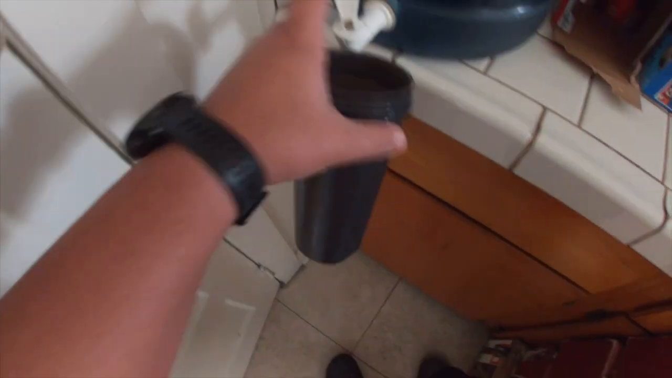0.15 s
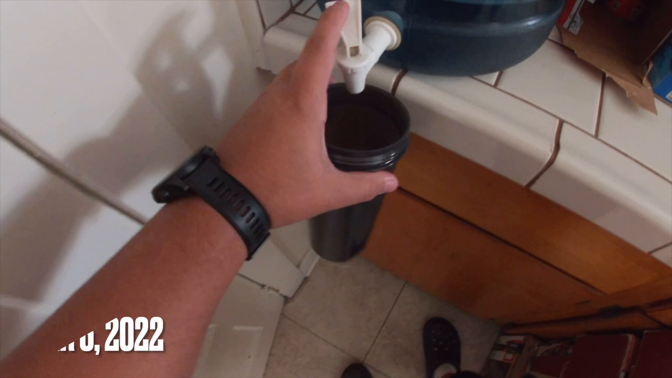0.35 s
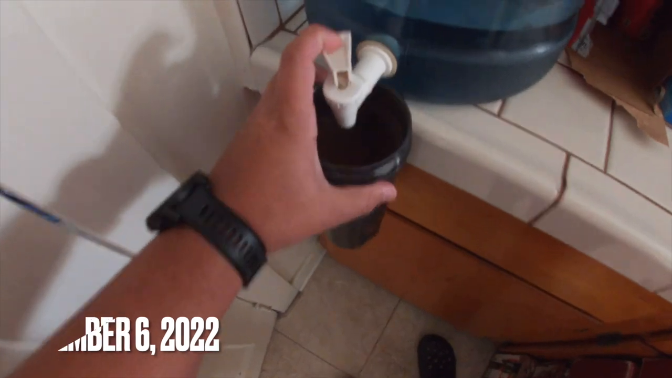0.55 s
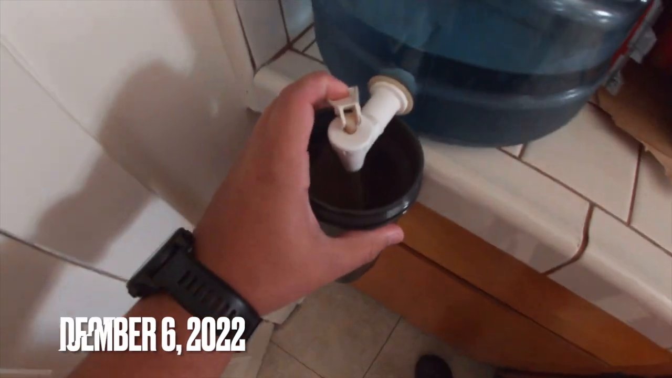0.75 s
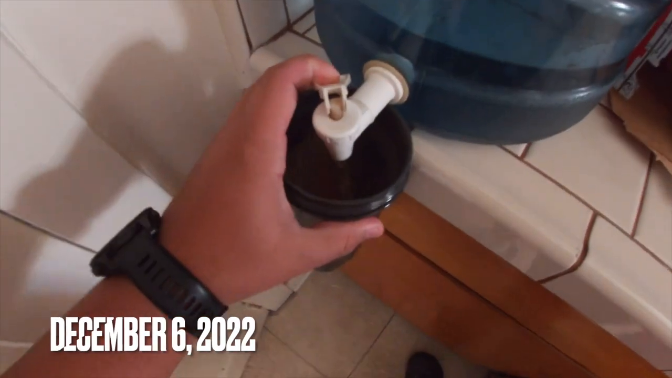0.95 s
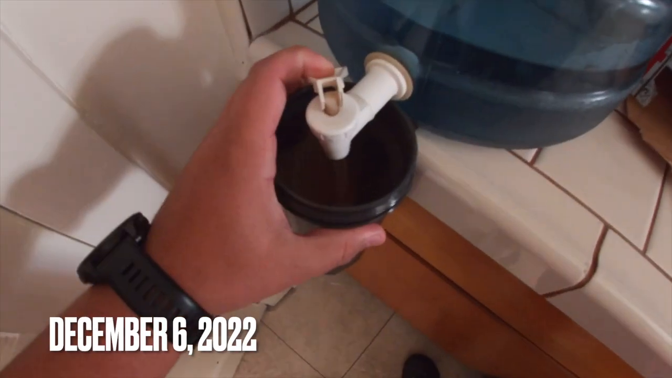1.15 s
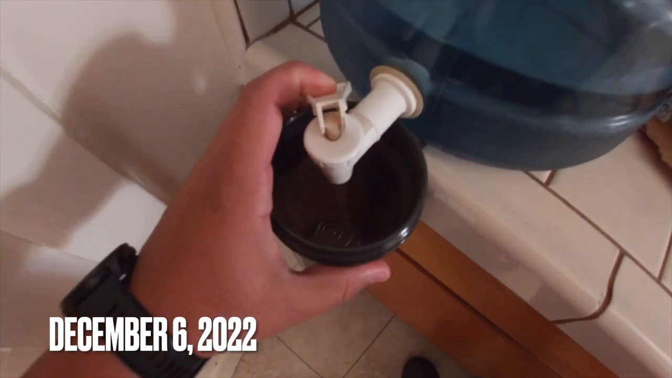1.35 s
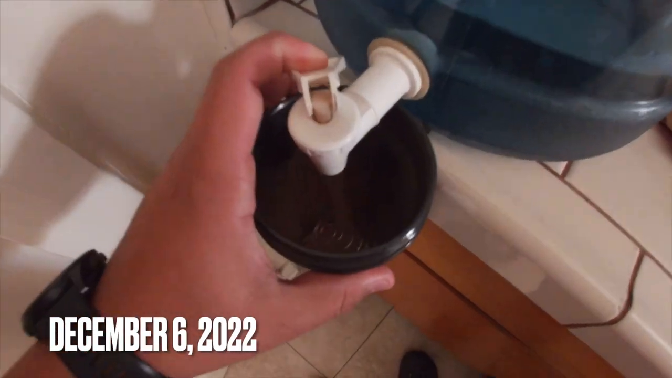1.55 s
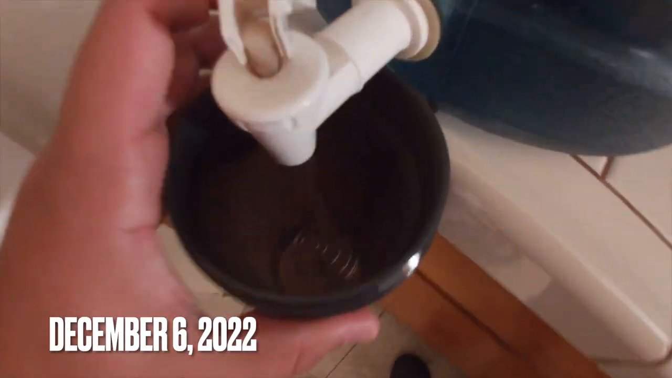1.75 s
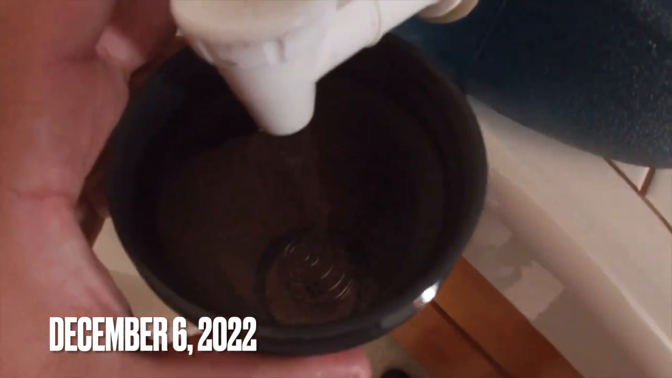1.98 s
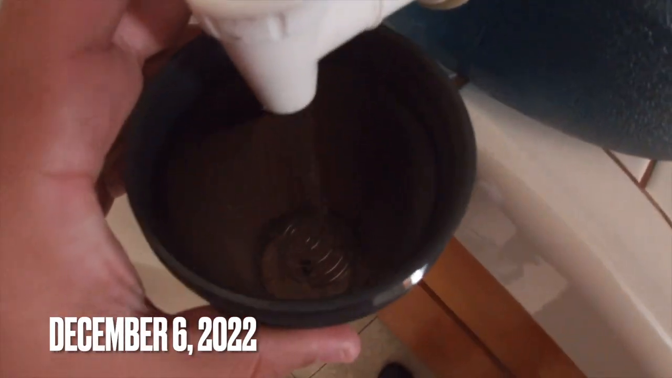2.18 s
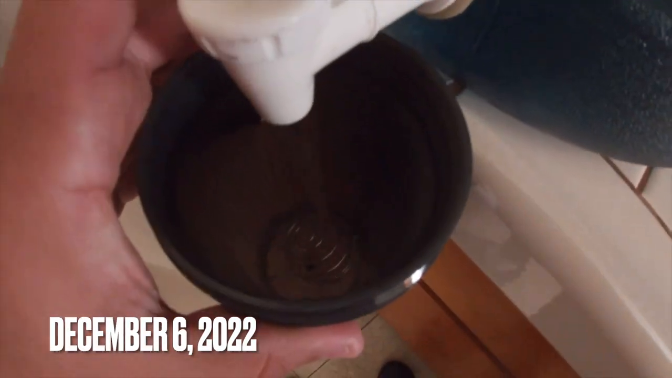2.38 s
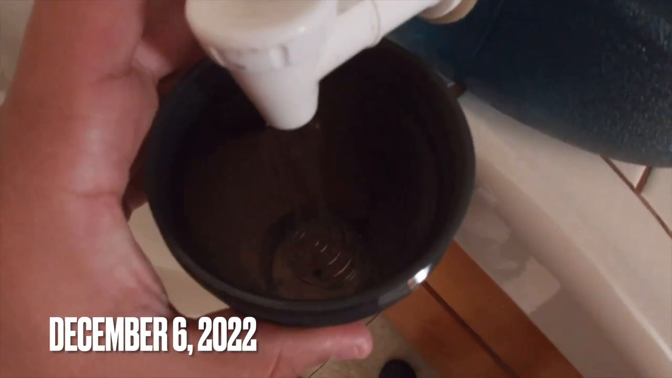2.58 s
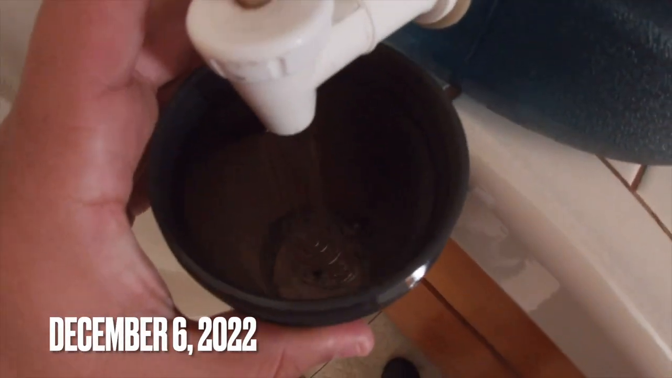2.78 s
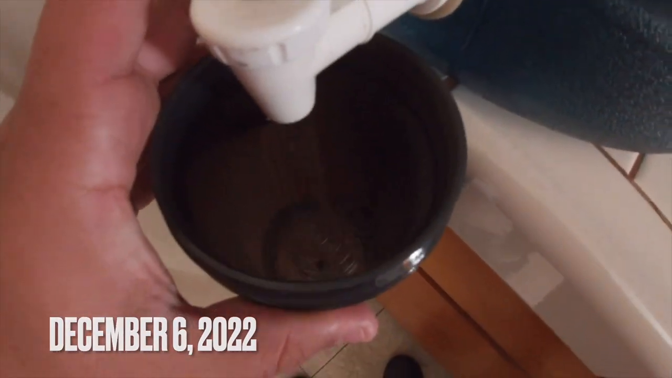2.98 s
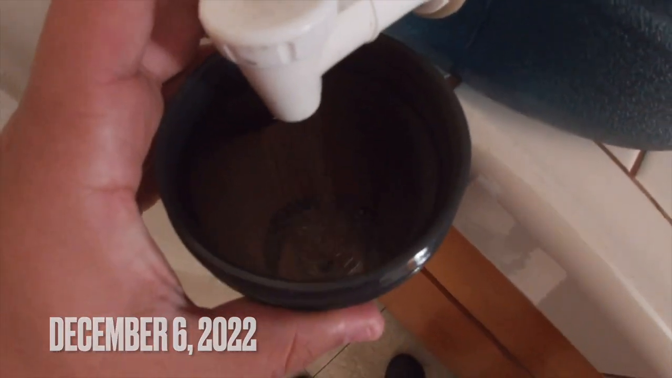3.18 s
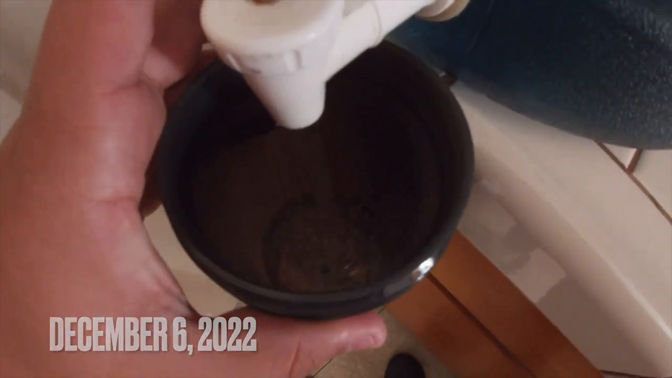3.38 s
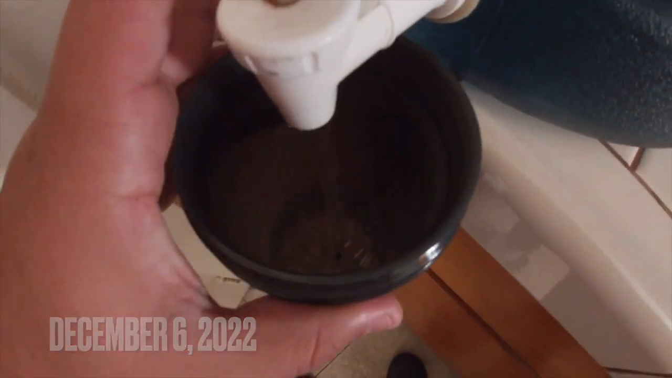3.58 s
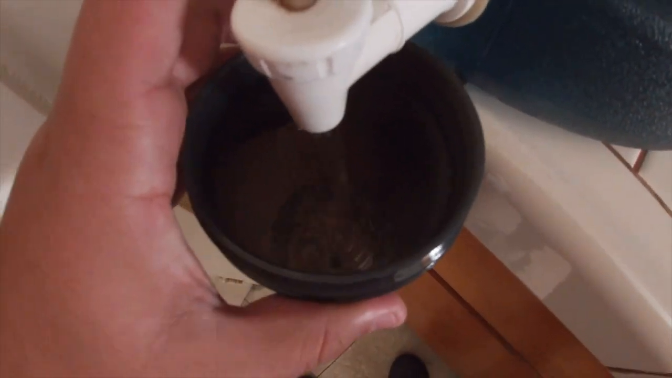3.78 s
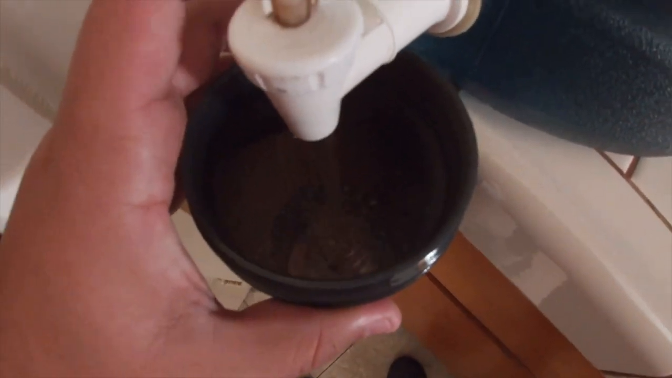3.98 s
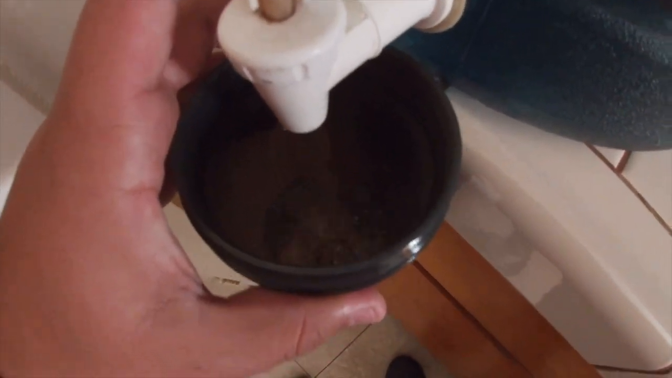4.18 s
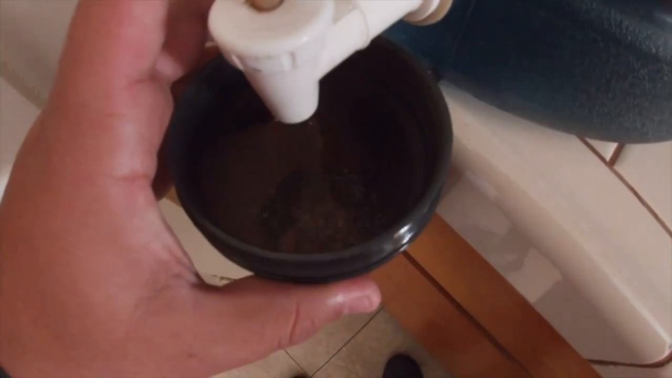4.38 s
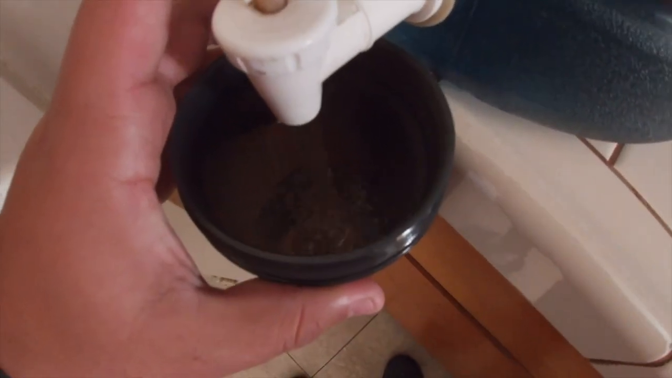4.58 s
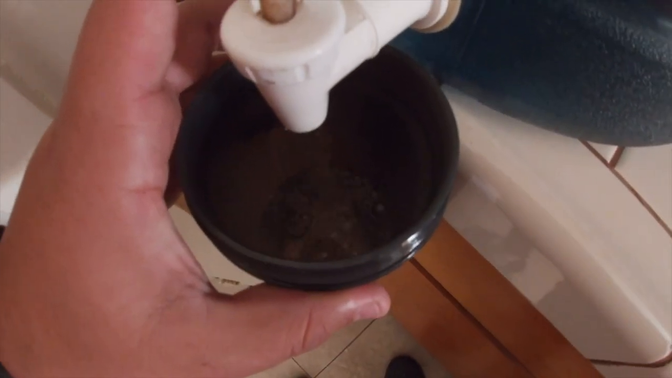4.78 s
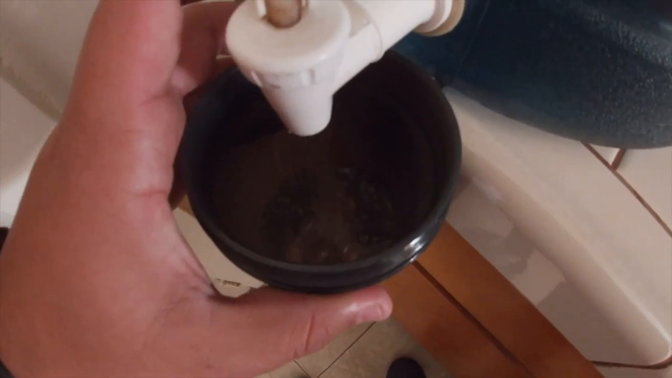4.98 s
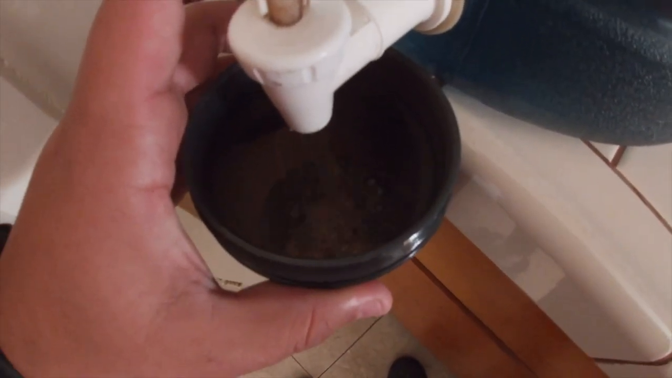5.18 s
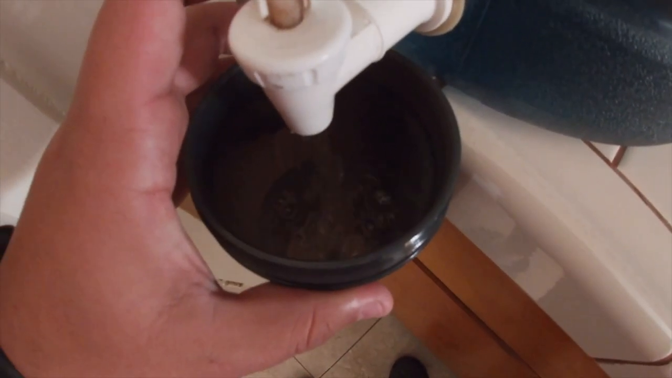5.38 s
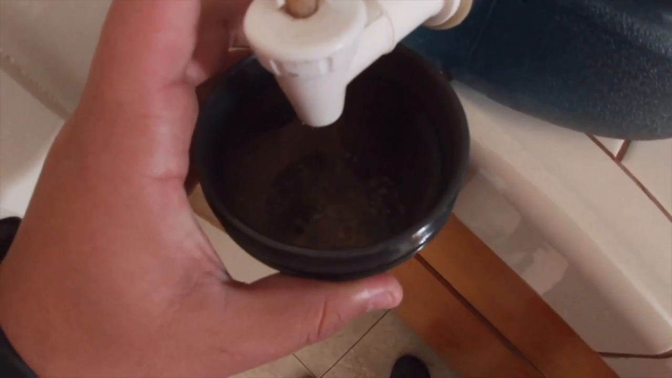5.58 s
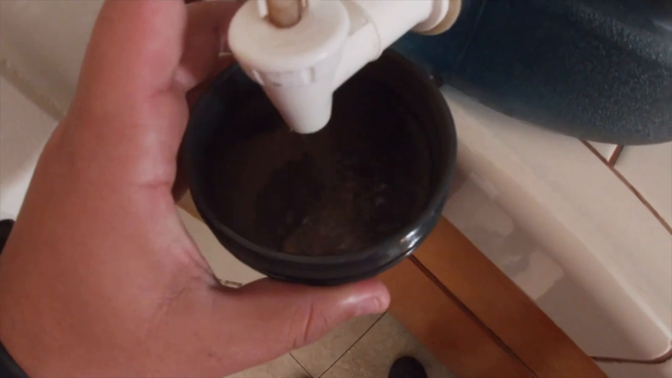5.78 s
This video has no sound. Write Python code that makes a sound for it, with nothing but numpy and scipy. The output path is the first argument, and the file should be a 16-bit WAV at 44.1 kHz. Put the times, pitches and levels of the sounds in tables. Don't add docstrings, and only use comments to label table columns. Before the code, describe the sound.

A hollow knock and light finger rustle come first, then a louder plastic clack as the tap opens. Water patters crisply on the dry cup bottom, soon turning to dense, wet plopping with chirping bubbles and fine fizz. Later the drops grow sparser and higher pitched. Heard very near on a small camera microphone, with short tile reflections and faint room rumble.

```python
import sys
import numpy as np
from scipy import signal
from scipy.fft import rfft, irfft
from scipy.io import wavfile
from scipy.ndimage import map_coordinates

SR = 44100
rng = np.random.default_rng(int(sys.argv[2]) if len(sys.argv) > 2 else 0)


def output_pcm(signal):
    pcm = np.clip(np.atleast_2d(signal).T, -1, 1) * 32767
    wavfile.write(sys.argv[1], SR, np.round(pcm).astype(np.int16))


def invert_db(level):
    return 10 ** (np.asarray(level, dtype=float) / 20)


N = 257741
TIME = np.arange(N) / SR
COVER_S = 1.29

# (time [s], peak level [dB])
PLOPS = [(1.324, -34), (1.345, -20), (1.416, -49), (1.503, -20.5), (1.605, -24), (1.624, -41), (1.653, -25),
         (1.679, -27), (1.712, -21.5), (1.73, -13), (1.785, -13), (1.814, -25), (1.832, -29), (1.851, -20),
         (1.883, -18.5), (1.907, -22.5), (1.92, -17.5), (1.942, -21), (1.976, -33), (2.015, -26.5),
         (2.053, -36), (2.068, -18), (2.102, -44), (2.137, -25), (2.177, -19.5), (2.204, -22), (2.238, -20),
         (2.273, -25), (2.296, -24), (2.312, -20.5), (2.362, -41), (2.384, -20), (2.418, -16), (2.452, -17),
         (2.49, -25), (2.509, -16.5), (2.544, -30), (2.567, -18), (2.632, -21), (2.67, -22), (2.704, -22),
         (2.723, -15.5), (2.767, -28), (2.818, -26.5), (2.852, -24), (2.932, -31), (2.962, -29),
         (3.02, -26.5), (3.064, -50), (3.093, -25), (3.125, -19), (3.139, -20), (3.17, -32), (3.221, -26),
         (3.203, -21), (3.249, -23), (3.311, -48)]
# (time [s], peak level [dB])
DRIBBLES = [(3.3388, -21.5), (3.36, -32), (3.5234, -32), (3.5366, -23), (3.895, -24), (3.7453, -35),
            (3.8033, -27.5), (3.8439, -23), (3.96, -39), (4.0114, -22.5), (4.32, -37), (3.909, -29),
            (4.3936, -24), (4.438, -25.5), (3.977, -26.5), (4.5284, -24), (4.592, -29), (4.8026, -25.5),
            (4.8817, -30), (5.03, -32), (5.0457, -25.5), (5.1172, -18.5), (5.229, -28.5), (5.2594, -27.5),
            (5.2934, -28), (5.471, -44), (5.622, -37), (3.929, -28), (5.697, -49)]
# (time [s], peak level [dB], thump level against the peak [dB])
DRIPS = [(3.326, -18.5, -39), (3.3865, -15, -37), (3.415, -19, -31), (3.453, -14.5, -19),
         (3.4778, -27.5, -28), (3.6042, -18, -23), (3.7022, -25.5, -18), (3.7835, -21, -28),
         (3.8766, -13, -30), (4.043, -21, -17), (4.1649, -14.5, -19), (4.197, -16, -21),
         (4.3588, -20.5, -19.5), (4.4148, -27.5, -12), (4.658, -27, -27), (4.7, -17, -18),
         (4.772, -20, -14), (4.91, -23.5, -12), (4.9547, -23, -23), (5.0102, -27, -22), (5.1014, -22, -13),
         (5.1673, -25, -15), (5.1846, -19, -16), (5.3192, -21.5, -17), (5.367, -25.5, -21),
         (5.438, -27, -22), (5.488, -26, -25), (5.7186, -39, -29), (5.815, -31.5, -27)]
# (time [s], pitch [Hz])
AIR_NOTE = [(1.2, 970), (1.6, 924), (1.9, 996), (2.15, 1048), (2.65, 1035), (2.95, 1081), (3.3, 1212),
            (3.9, 1238), (4.43, 1275), (4.7, 1350), (5.45, 1441), (5.84, 1620)]
# (time [s], flow level [dB], break-up into spray [dB])
FLOW = [(0.74, -55, -27), (0.78, -47.5, 6.5), (1.11, -40, 1.5), (1.28, -38.5, 1.5), (1.8, -36.5, -1.5),
        (2.02, -40, 3.5), (2.37, -37, -0.5), (2.9, -42, 1.5), (3.99, -43, -2.5), (4.15, -46.5, -2),
        (4.4, -45, -3), (5.13, -46, -0.5), (5.34, -49, -2), (5.6, -53, -2), (5.84, -64, 3)]
# (pitch [Hz], level [dB], time to fall 60 dB [s])
LEVER = [(308.2, 1, 0.36), (351.6, 12, 0.14), (428, 10.5, 0.063), (482, 3, 0.32), (570, 8.5, 0.25),
         (863, 5.5, 0.17), (1040, -29, 0.21), (2400, -33, 0.11)]


def column(swell_db):
    # (pitch [Hz], level [dB], time to fall 60 dB [s])
    wall_notes = [(702.3, -22.5, 0.069), (921, -19, 0.063), (1374, -13.5, 0.032)]
    pitch = np.interp(TIME, *np.transpose(AIR_NOTE))
    pushes = invert_db(swell_db) * patter(count=1600, spread_db=4)
    small = unit(resonate(pushes, pitch * (1 + 0.012 * wobble(45)), t60=0.044))

    shallow = [(s, db, -60 + rng.standard_normal()) for s, db in (*PLOPS, *DRIBBLES)]
    s, db, thump_db = np.transpose([*shallow, *DRIPS])
    a, b = rng.standard_normal((len(s), 2)).T
    hz = np.interp(s, TIME, pitch)
    hz = hz * (1 + (0.04 - 0.006 * s) * a)
    ring_s = 0.026 * invert_db(3.7 * b + 0.67 * (s - 4.5))
    big = rings(s, db + 4.5, hz, ring_s, attack=0.0013, size=2400)
    upper = rings(s, db - 10 + 3 * b, 2 * hz * (1 + 0.097 * b), 0.024)

    thump = rings(s, db + thump_db + 8, 600 * (1 + 0.24 * a), 0.017)
    for wall_hz, wall_db, t60 in wall_notes:
        vary_db = 3 * rng.standard_normal(len(s)) - 4.3 * abs(s - 2.92) + 0.6
        thump += rings(s, db + wall_db + vary_db, wall_hz, t60, size=2400)
    slap = rings(s, db - 12.5, 2960 * (1 + 0.2 * b), 0.054, attack=0.00005, size=100)
    return invert_db(stream()[0]) * small + big + upper + thump + slap


def bubbles(swell_db):
    # (time [s], peak level [dB], pitch [Hz])
    base_splats = [(.7368, -23.5, 2400), (.772, -24.5, 2380), (.805, -28, 2300), (.8406, -25.5, 2840),
                   (1.163, -19.5, 3020), (1.2382, -22, 2540), (1.255, -21, 2430)]
    # (time [s], peak level [dB], pitch [Hz])
    bubble_chirps = [(1.3165, -19, 2680), (1.5004, -25, 2670), (1.5176, -16.5, 2980), (1.611, -19, 2820),
                     (1.64, -17, 2750), (1.68, -15.5, 2700), (1.7298, -18, 3070), (1.7847, -30, 2360),
                     (1.8144, -17.5, 2460), (2.0672, -17.5, 2880), (2.1408, -17.5, 2830),
                     (2.1825, -17, 2840), (2.2188, -19, 2900), (2.313, -24, 2800), (2.384, -18, 2840),
                     (2.4168, -20, 2900), (2.439, -14.5, 2970), (2.4632, -17, 3120), (2.4906, -14.5, 2790),
                     (2.6037, -22, 2360), (2.632, -18, 2300), (2.6453, -12.5, 2900), (2.6982, -22, 2950),
                     (3.0937, -24, 3000), (3.1636, -11, 3180), (3.213, -18.5, 3000), (3.289, -23, 3050),
                     (3.312, -23, 3080), (3.36, -22, 2900), (3.487, -19.5, 3640), (3.601, -19.5, 2620),
                     (3.674, -19.5, 3700), (3.882, -22, 2390), (3.997, -17, 3860), (4.041, -18, 3850),
                     (4.1349, -22, 2430), (4.154, -19, 3000), (4.3596, -20, 2960), (4.6596, -29, 4100),
                     (4.6986, -20, 3900), (4.7728, -28, 2400), (4.8832, -30, 1860), (4.9095, -25, 2380),
                     (4.9535, -26, 3630), (5.0097, -30, 2450), (5.03, -18.5, 3230), (5.102, -36, 2290),
                     (5.191, -24.5, 2400), (5.2584, -27, 1940), (5.2596, -20, 2380), (5.3197, -25, 2140),
                     (5.4, -27, 3980), (5.4384, -31, 1960), (5.473, -21, 3070), (5.622, -25, 2890),
                     (5.7716, -24.5, 2570), (5.813, -26, 2060), (5.806, -27, 2340), (5.821, -30, 1620),
                     (5.742, -40, 1610), (2.068, -18, 3900)]
    s, db, a, b = scatter(count=9000, spread_db=3.6)
    hz = 2900 * np.exp(0.307 * a)
    small = in_cup(rings(s, db * s / 3, hz, 16 * invert_db(3.4 * b) / hz, rise=0.21, size=450))
    wash = coloured(rng.standard_normal(N), [(1200, -20), (2000, -2), (4200, 13.5), (5000, -13.5)])
    wash = in_cup(wash)
    third = unit(resonate(small, 3.137 * np.interp(TIME, *np.transpose(AIR_NOTE)), t60=0.0061))

    s, db, hz = np.transpose([*base_splats, *bubble_chirps])
    afloat = s > 1.0
    ring_s = np.where(afloat, 34, 55) / hz
    hz = np.where(afloat, 0.949, 1) * hz
    big = rings(s, db + 1.5, hz, ring_s, rise=0.46 * afloat[:, None], attack=0.00036)
    return invert_db(stream()[1] + swell_db) * (small + invert_db(-6.5) * third + invert_db(-14.5) * wash) + big


def fizz(swell_db):
    # (time [s], peak level [dB],
    # centre pitch [Hz])
    film_bursts = [(0.7648, -22, 8100), (0.8312, -24, 6800), (0.9635, -20, 7200), (1.0044, -17, 6960),
                   (1.0162, -19, 6700), (1.0544, -14, 6700), (1.1012, -9.5, 7100), (1.24, -20, 7200),
                   (1.3054, -27, 7100), (1.318, -10.5, 7100), (1.3942, -17.5, 6800), (1.4784, -20.5, 6100),
                   (1.5065, -26, 5960), (1.61, -18, 7700), (1.6404, -22, 6370), (1.6702, -21, 9000),
                   (1.879, -23, 7300), (1.896, -23, 7200), (2.0645, -24, 7430), (2.079, -14, 7200),
                   (2.1237, -16, 9050), (2.158, -14.5, 8900), (2.1956, -16, 8300), (2.3823, -14.5, 7900),
                   (2.4112, -18, 8510), (2.4709, -26, 7900), (2.4868, -14.5, 7520), (2.5572, -17.5, 6150),
                   (2.597, -19, 9000), (2.6942, -15, 7100), (2.7214, -20, 7950), (2.8032, -14.5, 7450),
                   (2.8995, -33, 6000), (2.9883, -21, 8070), (3.0761, -30, 5930), (3.094, -17, 8900),
                   (3.1514, -32, 7360), (3.1614, -31, 5400),
                   (0.7697, -19, 11120), (1.0162, -18, 11400), (1.115, -19, 10100), (1.153, -18, 13100),
                   (1.2218, -33, 12500), (1.2382, -19.5, 9750), (1.3041, -25, 12100), (1.446, -23, 9800),
                   (1.5061, -25, 9700), (1.7146, -23, 12000), (1.8988, -16.5, 12000), (1.9815, -17, 12400),
                   (2.0274, -19, 12500), (2.0524, -19, 11800), (2.065, -13.5, 11100), (2.098, -19, 9510),
                   (2.1242, -20, 11300), (2.194, -29, 10200), (2.2719, -22, 14400), (2.3193, -18, 11400),
                   (2.385, -18, 11400), (2.427, -19, 15000), (2.4713, -17, 11500), (2.489, -16, 11100),
                   (2.5113, -16, 11500), (2.5788, -16, 11400), (2.7046, -10.5, 11900), (2.723, -18, 11400),
                   (2.8416, -25, 13400), (2.873, -15, 12900), (3.094, -18, 12400), (3.159, -16, 12000),
                   (3.2028, -20, 11600), (3.2626, -16.5, 10500), (3.303, -40, 10900),
                   (3.253, -17, 8100), (3.36, -14, 8500), (3.7016, -20, 8140), (3.736, -18, 12000),
                   (3.756, -16.5, 14000), (3.7832, -12, 12400), (3.9295, -30, 6100), (4.0, -15.5, 5840),
                   (4.0414, -11, 11600), (4.133, -18.5, 14200), (4.1633, -16.5, 7500), (4.195, -15.5, 6460),
                   (4.359, -20, 12600), (4.401, -19, 11300), (4.6572, -25, 6050), (4.7, -20, 5580),
                   (4.801, -24.5, 8550), (4.858, -20.5, 5170), (4.883, -15, 11900), (4.954, -20, 11800),
                   (5.029, -19.5, 7400), (5.093, -16, 11900), (5.165, -13.5, 6430), (5.2496, -19, 7700),
                   (5.321, -17, 11900), (5.3713, -17.5, 14300), (5.4397, -13.5, 5670), (5.57, -23.5, 9200),
                   (5.7168, -17.5, 7430), (5.768, -25, 5630), (5.55, -28, 5900), (5.602, -27.5, 5600),
                   (5.662, -35.5, 5440), (5.787, -23, 7150),
                   (3.831, -23, 12100), (4.0757, -24, 12000), (4.146, -24, 12300),
                        (4.1814, -22, 11600), (4.373, -15.5, 12800), (4.4473, -30, 12200),
                        (4.8312, -23, 10700), (5.3567, -36, 15400), (5.4271, -43, 10600),
                        (5.4896, -16.5, 12800), (5.6236, -29, 11900), (5.696, -32, 9600),
                        (5.8156, -24, 15100), (5.83, -27, 10900)]
    # (pitch [Hz], level [dB], time to fall 60 dB [s], growth [dB/s])
    slosh_notes = [(5540, -2, 0.033, 2.5), (7360, -1.5, 0.0083, 0), (8680, -1.5, 0.014, 1),
                   (10500, -8.5, 0.016, 3.5), (12250, -1.5, 0.01, 1)]
    _, _, fizz_db, mist_db = stream()
    s, db, a, b = scatter(count=5500, spread_db=4.5)
    hz = 7500 * np.exp(0.27 * a)
    grains = in_cup(rings(s, db, hz, 28 * invert_db(3 * b) / hz, rise=0.12, attack=0.0002, size=220))
    hiss = in_cup(rng.standard_normal(N))

    cross = np.zeros(N)
    for note_hz, note_db, t60, grows in slosh_notes:
        s, db, _, _ = scatter(count=900, spread_db=5)
        flicks = puffs(s, db, t60=0.0048)
        moving_hz = note_hz * (1 + 0.011 * (TIME - 3) + 0.0035 * TIME * wobble(30))
        cross += invert_db(note_db + grows * (TIME - 3) + 3 * wobble(9)) * unit(resonate(flicks, moving_hz, t60))

    s, db, a, _ = scatter(count=3200, spread_db=4)
    fine = a > 0
    ticks = puffs(s[fine], db[fine], t60=0.0041)
    mist = unit(coloured(ticks, [(10500, -23), (12300, -7), (13700, 11), (15300, 8)]))
    ticks = puffs(s[~fine], db[~fine], t60=0.0091)
    mist += unit(coloured(ticks, [(7000, -20), (11000, -17.5), (15500, -26.5)]))

    s, db, hz = np.transpose(film_bursts)
    tone = rings(s, db + 0.5, hz, 40 / hz, rise=0.17, attack=0.000078, size=500)
    drop_s, drop_db = drops()
    crack = puffs(np.r_[s, drop_s], np.r_[db, drop_db - 4.5], t60=0.019)
    crack = in_cup(crack) * np.std(crack)

    spray = invert_db(-5) * grains + invert_db(-8.5 - 2.9 * (TIME - 2.5)) * hiss + invert_db(-9.5) * cross
    spray = invert_db(fizz_db + swell_db) * spray
    mist = invert_db(mist_db + swell_db + 2.8 * wobble(8)) * mist
    return spray + mist + tone + invert_db(-12) * crack


def plastic(swell_db):
    running_db = swell_db - 120 * (TIME < FLOW[0][0])
    since = TIME - COVER_S
    base_db = running_db - 46.5 + 3 * np.minimum(since, 0) - 30 * covered() - 5.5 * since
    wall_db = running_db - 56 - 4.5 * abs(TIME - 2.92)
    drive = patter(count=1200, spread_db=6.5)
    base = sum(invert_db(note_db) * unit(resonate(drive, hz, t60)) for hz, note_db, t60 in LEVER)
    base = coloured(base, [(1050, 0), (1250, -30), (2100, -22), (2400, 0)])
    wall = resonate(drive, 700 * (1 + 0.037 * wobble(20)), t60=0.06)
    return invert_db(base_db) * unit(base) + invert_db(wall_db) * unit(wall)


def drops():
    return np.transpose([row[:2] for row in (*PLOPS, *DRIBBLES, *DRIPS)])


def covered():
    return np.clip((TIME - COVER_S) / 0.055, 0, 1)


def stream():
    flow_db, spray_db = curves(FLOW)
    over_db = flow_db + 44
    column_db = -46.5 + 2.03 * over_db + 2 * (TIME - 3)
    column_db += -11.5 * (1 - covered())
    column_db += 3 * (TIME > 5.1)
    break_up_db = 0.63 * over_db + spray_db
    mist_db = -58.5 + 4 * break_up_db + 3.5 * (TIME - 3)
    return column_db, flow_db - 1.5, break_up_db - 44.5, mist_db


def churn():
    blows = np.bincount(np.round(drops()[0] * SR).astype(int), minlength=N)
    stir = signal.lfilter([1], [1, -np.exp(-1 / 0.0023 / SR)], blows)
    chance_db = 3 * np.tanh((2 * wobble(22.03) + 8.4 * wobble(50)) / 3)
    return chance_db + 8 * np.minimum(stir, 1)


def patter(count, spread_db):
    s, db, a, _ = scatter(count, spread_db)
    pushes = np.bincount((s * SR).astype(int), np.sign(a) * invert_db(db), N)
    return coloured(pushes, [(150, -38), (600, -11.5), (900, -4.5), (1600, -1), (4000, -15.5)])


def in_cup(x):
    # (frequency [Hz], gain [dB])
    bare_colour = [(880, -58), (1500, -49), (2970, -24.5), (3350, -18), (4800, -24), (5260, -1.5),
                   (6050, -6), (6820, -1), (13800, -18.5), (16000, -41), (16500, -83)]
    # (frequency [Hz], gain [dB])
    shallow_colour = [(880, -16.5), (1500, -22.5), (1890, -18.5), (2850, -6), (3450, -11), (3970, -6.5),
                      (4660, -14), (7390, 0), (9790, -6), (11600, -13), (15400, -29), (16000, -64),
                      (16500, -0.5)]
    # (frequency [Hz], gain [dB])
    deep_colour = [(880, -8), (1500, 6.5), (1950, 4), (3120, -2), (3410, -6), (4010, 7.5), (4760, -14),
                   (5470, 3), (8680, 1.5), (9500, -10.5), (12300, 5), (15400, -1.5), (16500, -41)]
    wet = np.clip((TIME - 1.02) / 0.18, 0, 1)
    full = np.clip((TIME - 2.4) / 2.8, 0, 1)
    out = np.sqrt(1 - wet) * unit(coloured(x, bare_colour))
    out += np.sqrt(wet * (1 - full)) * unit(coloured(x, shallow_colour))
    return out + np.sqrt(full) * unit(coloured(x, deep_colour))


def knocks():
    # (time [s], ring level [dB], push level [dB])
    blow_events = [
        (.216, -10, -9.5),
        (0.7203, -8.5, 4.5),
        (1.08, -29, -35),
    ]
    # (frequency [Hz], gain [dB])
    rattle_colour = [(59, -50), (100, -11), (570, 1.5), (691, -10), (1010, -1.5), (1800, -25.5),
                     (2370, -13), (3400, -30), (7770, -30), (16000, -40)]
    # (pitch [Hz], level [dB], time to fall 60 dB [s])
    rim_notes = [(304, 1.5, 0.38), (340, -18, .25), (443, 7, 0.26), (477, -3, 0.49), (787, -12, 0.13),
                 (860, 1, 0.11), (1006, 8, 0.13), (1360, -5, .12), (1530, -6, 0.13), (2140, -21, 0.19),
                 (2550, -24, .1)]
    s, ring_db, push_db = np.transpose(blow_events)
    rattle = puffs(s, ring_db, t60=0.25)
    out = invert_db(-13.5) * unit(coloured(rattle, rattle_colour)) * np.std(rattle)
    out -= rings(s, push_db, 748, 0.012, attack=0.00077)
    out += rings(s, push_db - 10, 351, 0.11, attack=0.0067, size=3000)
    for at, db, notes in zip(s, ring_db, (rim_notes, LEVER, LEVER[:4])):
        for hz, note_db, t60 in notes:
            flutter = 1 + 0.12 * wobble(40)
            out -= rings(at, db + note_db - 17.5, hz, t60, size=16000) * flutter
    return out


def fingers():
    # (time [s], peak level [dB], hollow level against the peak [dB])
    finger_ticks = [(0.0144, -38, 8), (0.04, -41, 13), (0.051, -41, -15), (0.062, -38, -3),
                    (0.148, -42, -16), (0.187, -35, -31), (.198, -40, -35), (0.2169, -22, 12),
                    (0.23, -22.5, -20), (0.438, -33, -28), (0.4438, -27, -8), (0.462, -36, -9),
                    (0.4915, -28, 0), (0.5144, -31.5, -21), (0.568, -36, -25), (0.5923, -29, 7),
                    (0.623, -37.5, 2), (0.648, -45, -20), (0.6998, -39.5, -21), (0.7162, -27, 7)]
    # (frequency [Hz], gain [dB])
    skin_colour = [(760, -123), (1300, -23), (1850, -8.5), (2440, -1.5), (3760, -11.5), (4680, -11.5),
                   (5200, -12.5), (6350, -6), (7670, -10), (10700, -14), (16000, -33)]
    hollow = resonate(rng.standard_normal(N), 870 * (1 + 0.0058 * wobble(27.5)), t60=0.044)
    hollow = unit(resonate(hollow, 875, t60=0.072))
    rustle = unit(coloured(rng.standard_normal(N) * invert_db(3.3 * wobble(91.1)), skin_colour))
    rustle = coloured(rustle, [(6000, 1), (10000, -4), (14000, 3)])

    s, db, hollow_db = np.transpose(finger_ticks)
    ticks = puffs(s, db - 0.5, t60=0.016)
    ticks = unit(coloured(ticks, skin_colour)) * np.std(ticks)
    ticks += rings(s, db + hollow_db, 900, 0.017) + rings(s, db - 17, 2374, 0.19)
    hollow = strokes(column_at=2, fade_db_per_s=322) * hollow
    return hollow + strokes(column_at=3, fade_db_per_s=138) * rustle + ticks


def strokes(column_at, fade_db_per_s):
    # (time [s], length [s], hollow level [dB], rustle level [dB])
    finger_strokes = [
        (0, 0.019, -37.5, -46),
        (0.224, 0.058, -44, -42.5),
        (0.458, 0.029, -44.5, -46),
        (0.567, 0.022, -55, -52),
        (0.718, 0.018, -47, -47),
    ]
    rows = np.array(finger_strokes)
    since = TIME - rows[:, :1]
    grip = np.clip(since / 0.019 + 1, 0, 1)
    fade_db = fade_db_per_s * np.maximum(since - rows[:, 1:2], 0)
    return np.sum(grip * invert_db(rows[:, column_at, None] - fade_db), axis=0)


def kitchen(x):
    # (frequency [Hz], time to fall 60 dB [s])
    tile_echo = [(200, 0.32), (1500, 0.21), (10000, 0.029)]
    hz, t, z = signal.stft(rng.standard_normal(SR // 2), SR, nperseg=256)
    fading = z * invert_db(-60 * t / along(tile_echo, hz)[:, None])
    tail = signal.istft(fading, SR, nperseg=256)[1]
    return signal.fftconvolve(np.pad(x, (250, 0)), tail / np.linalg.norm(tail))[:N]


def house():
    # (time [s], rumble level [dB], drone level [dB])
    house_levels = [
        (0.0, -51, -53.5),
        (0.81, -48.5, -50.5),
        (2.07, -57, -61),
        (5.84, -53.5, -60.5),
    ]
    # (frequency [Hz], gain [dB])
    rumble_colour = [(12, -43), (22, -2), (38, 0), (81, -1), (200, -16.5), (260, -66), (440, -120)]
    # (frequency [Hz], gain [dB])
    drone_colour = [(88, -38.5), (150, -12), (193, -13), (281, -0.5), (441, 0.5), (539, -13.5), (1200, -18),
                    (1560, -20), (2640, -120)]
    rumble_db, drone_db = curves(house_levels)
    rumble = unit(coloured(rng.standard_normal(N), rumble_colour))
    rumble *= invert_db(rumble_db + 3 * wobble(4.115) + 1.4 * wobble(25))
    floor = rings(0.15, -43, 80.3, 2.9, attack=0.17, size=18000) * (TIME < 0.74)
    drone = unit(coloured(rng.standard_normal(N), drone_colour)) * invert_db(drone_db + 1.8 * wobble(4.5))
    hum = coloured(rng.standard_normal(N), [(110, -37), (155, 3.5), (200, -4.5), (250, 9.5), (300, -30)])
    return rumble + floor + drone + invert_db(-57.5) * unit(hum) * (TIME > 4.52)


def rings(s, db, hz, t60, rise=0., attack=0.0011, size=1400):
    s, db, hz, t60 = (np.reshape(v, (-1, 1)) for v in np.broadcast_arrays(s, db, hz, t60))
    t = np.arange(size) / SR
    wave = np.sin(2 * np.pi * hz * t * (1 + rise * t / t60 / 2))
    wave *= hz * (1 + rise) < SR / 2.3
    wave *= invert_db(db - 60 * t / t60) * (1 - np.exp(-t / attack))
    at = np.round(s * SR).astype(int) + np.arange(size)
    return np.bincount(at.ravel(), wave.ravel(), N + size)[:N]


def puffs(s, db, t60):
    blows = np.bincount(np.round(np.asarray(s) * SR).astype(int), invert_db(db), N)[:N]
    return rng.standard_normal(N) * signal.lfilter([1], [1, -invert_db(-60 / t60 / SR)], blows)


def resonate(drive, hz, t60):
    turn = np.exp(2j * np.pi * np.cumsum(np.broadcast_to(hz, N)) / SR)
    return np.imag(signal.lfilter([1], [1, -invert_db(-60 / t60 / SR)], drive / turn) * turn)


def coloured(x, spectrum):
    gain = invert_db(along(spectrum, np.fft.rfftfreq(4096, 1 / SR)))
    c = irfft(np.log(gain + 1e-6))
    c[1:2048] *= 2
    c[2049:] = 0
    return signal.fftconvolve(x, irfft(np.exp(rfft(c))))[:N]


def scatter(count, spread_db):
    u = rng.random((count, 2))
    size_db = np.minimum(-spread_db * np.log(1 - u[:, 1]), 3.42 * spread_db)
    return u[:, 0] * N / SR, size_db, *rng.standard_normal((count, 2)).T


def wobble(rate):
    return map_coordinates(rng.standard_normal(int(N * rate / SR) + 4), [TIME * rate])


def curves(rows):
    s, *cols = np.transpose(rows)
    return [np.interp(TIME, s, c, left=-120) for c in cols]


def along(points, hz):
    f, v = np.transpose(points)
    return np.interp(np.log(hz + 1), np.log(f + 1), v)


def unit(x):
    return x / np.sqrt(np.mean(x ** 2) + 1e-20)


def scene():
    swell_db = churn()
    water = column(swell_db) + plastic(swell_db) + bubbles(swell_db) + fizz(swell_db)
    blows = knocks()
    room = kitchen(invert_db(-19.5) * water + invert_db(-12.5) * blows)
    return (water + blows + fingers() + room + house())[None]


def band_limit(x):
    return signal.sosfilt(signal.butter(12, 16800, fs=SR, output="sos"), x)


def record(dry):
    band = signal.ellip(10, 0.5, 45, 15900, fs=SR, output="sos")
    return band_limit(signal.sosfilt(band, dry))


dry = scene()
out = record(dry)
output_pcm(out)
```